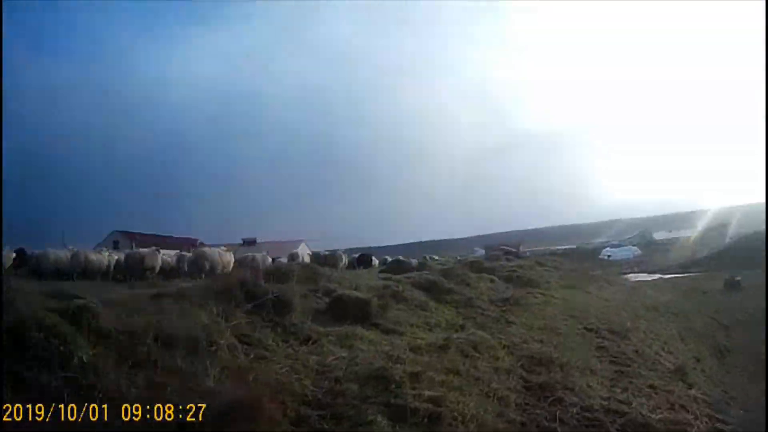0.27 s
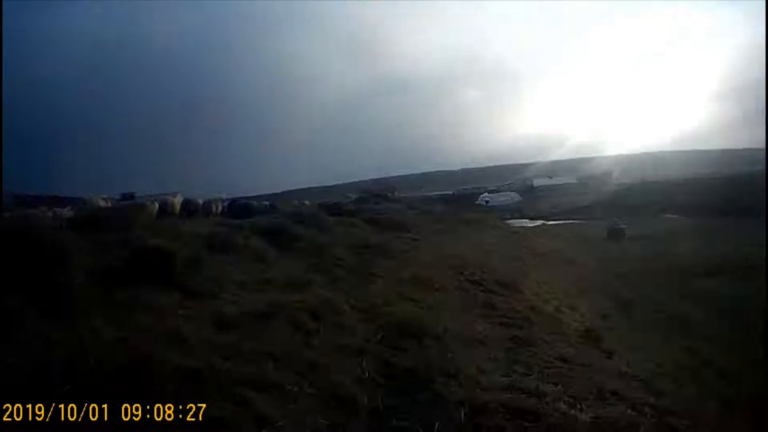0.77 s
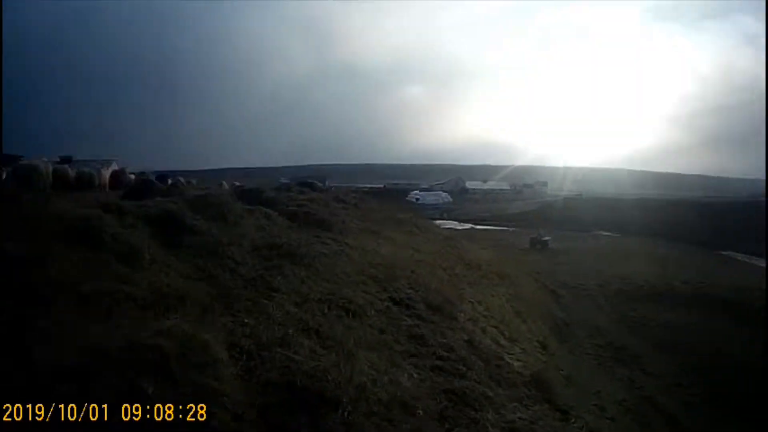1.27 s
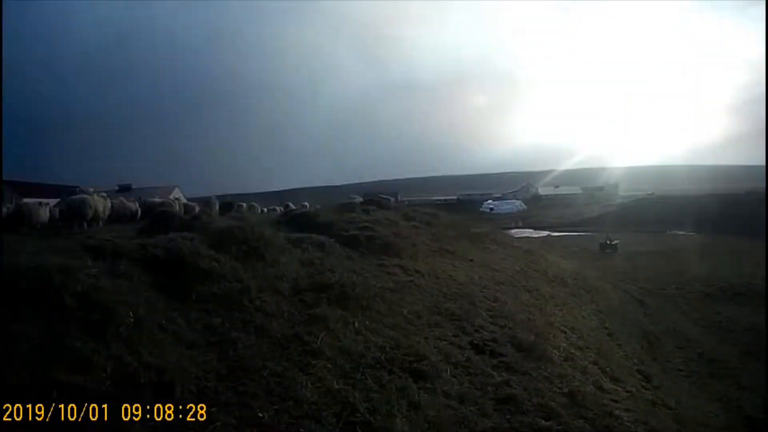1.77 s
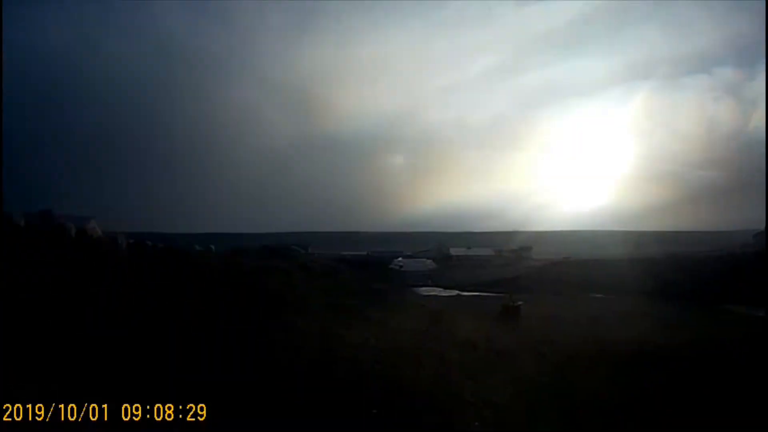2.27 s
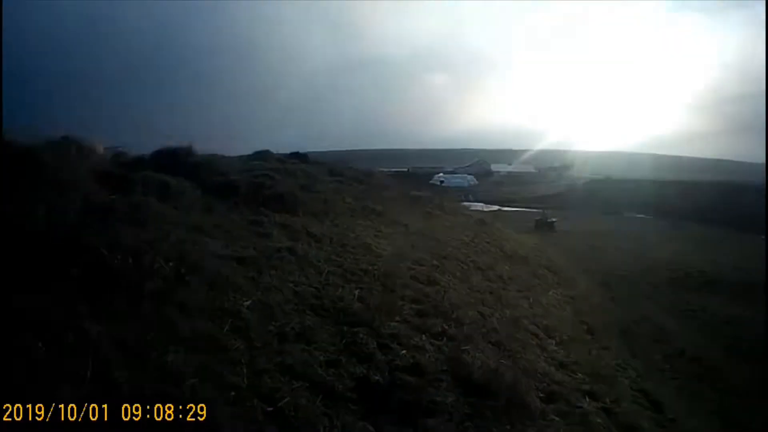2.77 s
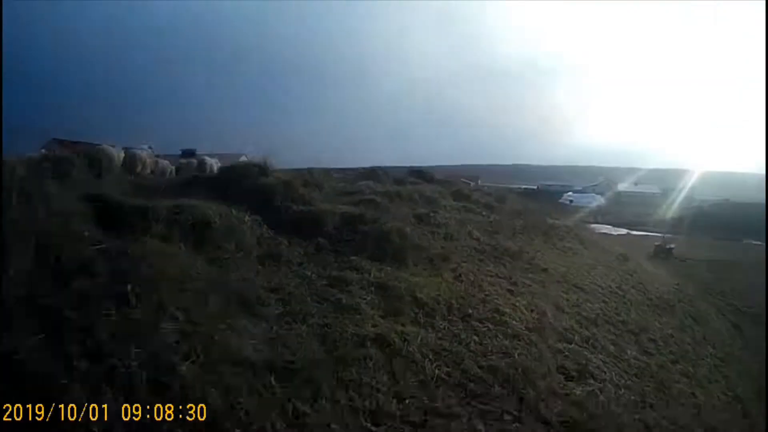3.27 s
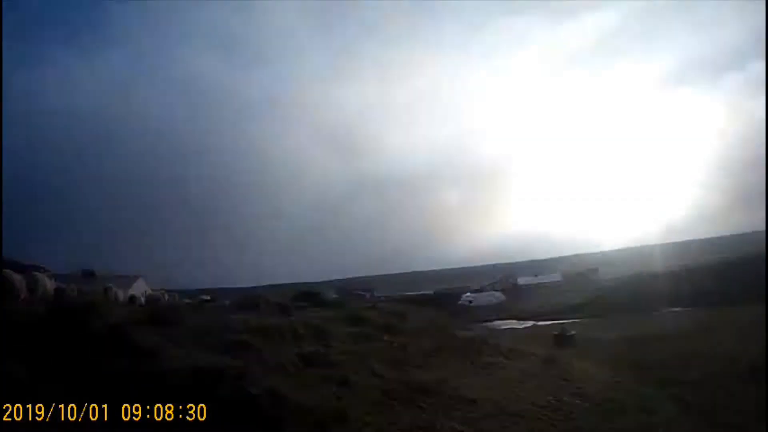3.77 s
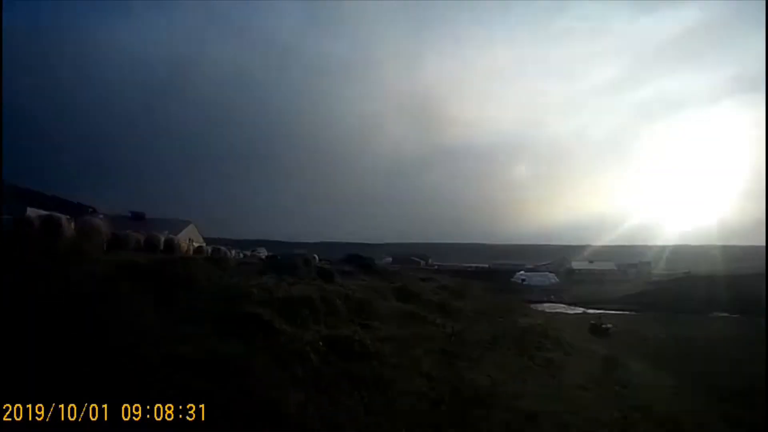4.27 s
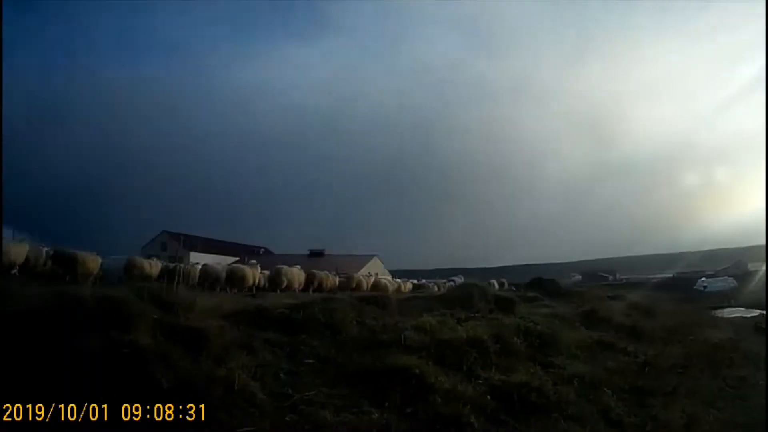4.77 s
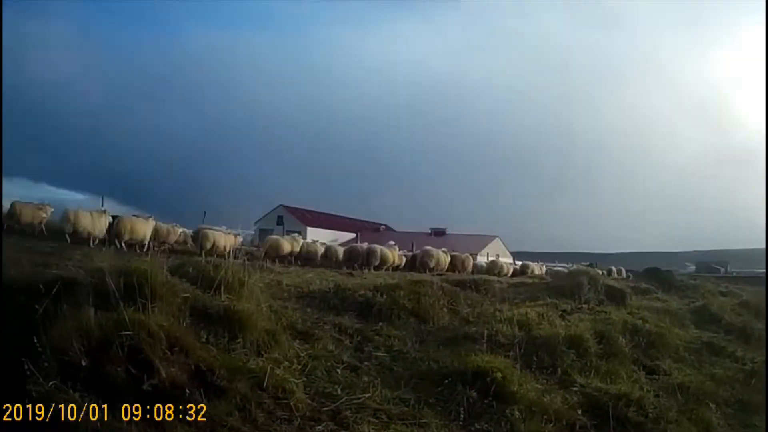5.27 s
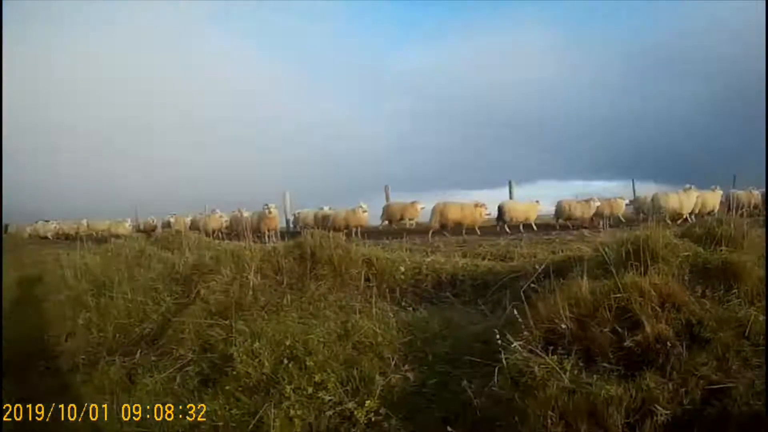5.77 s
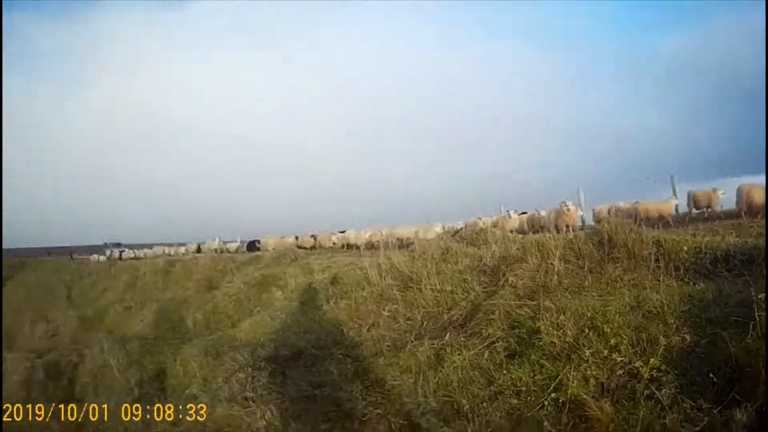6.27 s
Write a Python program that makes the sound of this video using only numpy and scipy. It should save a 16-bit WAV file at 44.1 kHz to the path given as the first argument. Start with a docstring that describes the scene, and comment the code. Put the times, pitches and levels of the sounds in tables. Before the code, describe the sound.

Someone strides through coarse grass, rustling and crunching, the strapped-on microphone bumping and rumbling until the walker stops and only faint wind and hiss remain.

```python
"""0-5 s: a walker strides through rough grass on open ground, a small cased microphone strapped on.
Brushes and crunches are noise grains coloured by the case; shakes ring the mount; noise buffets the port.
Stalks snap (noise bursts), jolts swing the pressure and ring, tall blades swish (bright grains).
5 s to the end: the walker slows to a stop and turns; events thin out, the mount trembles faintly.
Throughout: far wind (shaped noise) and faint white hiss."""
import sys
import numpy as np
from scipy import signal
from scipy.fft import rfft, irfft, next_fast_len
from scipy.io import wavfile
from scipy.ndimage import uniform_filter1d

SR = 44100
rng = np.random.default_rng(int(sys.argv[2]) if len(sys.argv) > 2 else 0)


def int16_out(signal):
    """Quantize to a 16-bit WAV file."""
    q = np.round(np.clip(np.atleast_2d(signal).T, -1, 1) * 32767)
    wavfile.write(sys.argv[1], SR, q.astype(np.int16))


N = 287796

# far wind spectrum: f/Hz, level/dB
FAR_WIND_COLOUR = [(18, -35), (30, 4), (71, -25.5), (197, -7.5), (647, -18.5), (1150, -24), (2770, -40),
                   (4000, -39.5), (5200, -44), (8800, -120)]
FAR_WIND_DB = -55.5
# boot or leg brushing blades: full at t/s, rise over 20 dB/s, hold/s, fall over 20 dB/s, level/dB,
# then against level: 2 kHz register/dB, treble/dB, low-mid/dB
BRUSHES = [(0.04, 0.083, 0.02, 0.046, -39, -4.0, -9, -0.5),
           (0.142, 0.042, 0.057, 0.052, -38, -6, -10.5, -7),
           (0.236, 0.012, 0.088, 0.014, -46.5, -4, -12.5, -2.5),
           (0.384, 0.057, 0.032, 0.058, -36.5, -7, -11.5, -4),
           (0.496, 0.052, 0.099, 0.029, -39.5, -8.5, -9, -7.5),
           (0.665, 0.011, 0.028, 0.025, -50, -12, -9.0, -4.5),
           (0.745, 0.012, 0.068, 0.018, -43, -11, -6, -2.5), (0.779, 0.019, 0.008, 0.12, -33, -2.5, -9, -3),
           (0.934, 0.094, 0.022, 0.052, -37.5, -7, -11.5, -11),
           (1.033, 0.091, 0.018, 0.016, -50.5, -7.5, -16, -5),
           (1.165, 0.13, 0.004, 0.055, -36, -8, -11, -3.5),
           (1.257, 0.044, 0.16, 0.098, -46.0, -7, -10, -2.5),
           (1.488, 0.12, 0.007, 0.014, -46, -10, -13, -5), (1.571, 0.033, 0.019, 0.032, -36, -3, -9, 1.5),
           (1.645, 0.092, 0.036, 0.045, -40.5, -2, -12, -3.5),
           (1.726, 0.037, 0.084, 0.17, -37.0, -6.0, -12.5, -6),
           (1.957, 0.0082, 0.004, 0.054, -42.5, 4.5, -9, 5),
           (1.997, 0.034, 0.037, 0.028, -30, -6.5, -12, -2.5),
           (2.153, 0.12, 0.071, 0.058, -32.0, -5, -6, -2.5),
           (2.436, 0.037, 0.0096, 0.031, -22.5, -7.5, -12, -5.5),
           (2.486, 0.024, 0.004, 0.069, -38.5, -0.5, -15.5, -8),
           (2.64, 0.14, 0.025, 0.046, -31.5, -4, -9.5, -4.5),
           (2.732, 0.043, 0.019, 0.071, -32, -6.0, -12.5, -1),
           (2.919, 0.37, 0.041, 0.11, -37, -4.5, -8, -4.5), (3.033, 0.032, 0.019, 0.012, -42, -11, -11, -6),
           (3.138, 0.016, 0.0043, 0.027, -19, -5.5, -17, -5),
           (3.177, 0.222, 0.065, 0.019, -41.5, -4, -10, 0.0),
           (3.288, 0.079, 0.056, 0.045, -28.5, -5, -13, -9.5),
           (3.516, 0.072, 0.006, 0.048, -37, -3, -12, -0.5),
           (3.622, 0.15, 0.098, 0.016, -45, -9, -9.5, -5.5), (3.766, 0.013, 0.06, 0.056, -53, -12, -12, -2),
           (3.887, 0.038, 0.023, 0.014, -38, -10, -7.0, 0),
           (3.946, 0.036, 0.009, 0.095, -39.0, -4.0, -10, -0.5),
           (4.048, 0.042, 0.18, 0.018, -44.5, -2.5, -11.0, -3.5),
           (4.284, 0.049, 0.039, 0.081, -34, -10, -12.0, -5.5),
           (4.422, 0.11, 0.052, 0.047, -38.5, -11, -9.0, -5.5),
           (4.633, 0.54, 0.052, 0.14, -49.5, -19, -16, -0.5),
           (4.691, 0.037, 0.004, 0.077, -40.5, -4.5, -8.5, -6.5),
           (4.908, 0.14, 0.005, 0.11, -45.0, -0.5, -11.5, -3.5),
           (5.163, 0.012, 0.049, 0.037, -58.5, -4, -10.5, 5.5),
           (6.229, 0.32, 0.004, 0.057, -59.5, -0.5, -6.5, -0.5),
           (6.308, 0.066, 0.004, 0.069, -52, -3, -7, -5), (6.362, 0.012, 0.1, 0.049, -57.5, 1, -7.5, -6)]
# cloth rustle between brushes: t/s, level/dB
CLOTH = [(0, -58), (4.6, -57.5), (5.2, -65), (6.53, -73)]
# cloth colour against its level: 2 kHz register/dB, treble/dB, low-mid/dB
CLOTH_COLOUR_DB = (-3.5, -10.5, -4.5)
# foot landing or pulling out: t/s, level/dB, low-mid against it/dB, treble against it/dB
CRUNCHES = [(0.1451, -35, -17, -21), (0.387, -30.5, 3, -23), (0.4738, -42, -9, -10), (0.7447, -37, 1, -8),
            (1.558, -34.5, -6, 0), (1.5815, -25, 7.5, -24), (1.9574, -39, -7, -14), (2.004, -27, 8, -19),
            (2.197, -26.5, 0, -4.5), (2.4049, -35, -14, -14), (2.4384, -19, -6, -21),
            (2.4917, -33, -19, -28), (3.14, -10.5, -3, -30), (3.287, -18, -14, -19),
            (3.4975, -28.5, -15, -11), (3.7688, -48, -10, -20), (3.885, -29.5, 8.5, -10),
            (4.2682, -39, -5.5, -17), (4.292, -35.5, 13, -23), (4.6942, -29, -20, -24)]
CRUNCH_RISE_S, CRUNCH_T60_S = 0.0018, 0.055
CRUNCH_UPPER_DB = -13.5  # 2 kHz register against level
# colour of the case: f/Hz, level/dB
CASE_COLOUR = [(240, -2), (400, -13.5), (639, -9.5), (757, -10), (897, -25), (1230, 4.5), (1470, -11),
               (1990, -2.5), (2480, -24), (3520, -19.5), (4230, -23.5), (5280, -46.5), (6010, -35.5),
               (6850, -50), (9000, -53.5), (11700, -82), (19800, -120)]
# swells of the mount's ringing: tugs up to 5.2 s, after that only chance swells of its faint trembling;
# full at t/s, rise over 20 dB/s, hold/s, fall over 20 dB/s, level/dB,
# then against level: upper modes/dB, lowest mode/dB
MOUNT_SWELLS = [(0.041, 0.17, 0.034, 0.021, -27, -11.5, -17),
                (0.156, 0.082, 0.053, 0.048, -35.5, -6.0, -12),
                (0.316, 0.023, 0.0056, 0.022, -35, -14, -9.5), (0.381, 0.062, 0.056, 0.06, -32, -8, -10),
                (0.529, 0.073, 0.0056, 0.13, -30.5, -8.5, -6), (0.653, 0.017, 0.009, 0.056, -35.5, -14, -2),
                (0.754, 0.037, 0.017, 0.014, -29.5, -4, -0.5), (0.792, 0.056, 0.075, 0.058, -30, -7, -4),
                (0.931, 0.16, 0.025, 0.097, -40, 1.5, -8), (1.11, 0.024, 0.12, 0.018, -33.5, -6.5, -2.5),
                (1.287, 0.047, 0.018, 0.41, -38, -5.5, -1.5), (1.585, 0.12, 0.004, 0.24, -29.5, -4.5, -0.5),
                (1.698, 0.015, 0.006, 0.035, -26.5, -11, -10.0), (1.761, 0.021, 0.004, 0.04, -35.5, 1, -2),
                (1.971, 0.022, 0.014, 0.025, -26, -3, -10.5),
                (2.012, 0.019, 0.005, 0.13, -20.5, -10.5, -15.5),
                (2.152, 0.044, 0.016, 0.024, -21.5, -5, -16), (2.214, 0.02, 0.01, 0.16, -33.0, -2, 0),
                (2.436, 0.026, 0.0034, 0.053, -13.5, -6, -18), (2.474, 0.13, 0.005, 0.093, -23.5, -6.5, -9),
                (2.684, 0.38, 0.09, 0.051, -32, 0, -3.5), (2.799, 0.053, 0.0053, 0.03, -22.5, -12.0, -9),
                (2.878, 0.044, 0.007, 0.067, -25.5, -7.5, -15.5),
                (2.958, 0.077, 0.019, 0.016, -31.0, -9, -14), (3.126, 0.055, 0.036, 0.058, -20, -10.5, 2),
                (3.273, 0.23, 0.06, 0.064, -32, -3.5, -10.0), (3.499, 0.065, 0.033, 0.017, -32, 1.0, -16),
                (3.561, 0.014, 0.004, 0.082, -23.5, -14, -15), (3.68, 0.22, 0.033, 0.017, -34.5, -10, -8),
                (3.87, 0.039, 0.012, 0.096, -30.5, -3.5, -1), (3.943, 0.024, 0.012, 0.11, -28.5, -6, -5),
                (4.151, 0.012, 0.014, 0.36, -43.5, -11, -4), (4.324, 0.092, 0.0056, 0.022, -22, -6, -13),
                (4.366, 0.089, 0.085, 0.094, -39, -9, 4.5), (4.781, 0.014, 0.0072, 0.0098, -23, -20, -7),
                (4.917, 0.103, 0.004, 0.077, -40.5, -10, -4), (5.161, 0.015, 0.043, 0.054, -35.5, -25, -19),
                (5.886, 0.035, 0.01, 0.32, -55.5, -6.5, 3.5), (6.372, 0.24, 0.005, 0.12, -45, 0, -1),
                (6.441, 0.024, 0.057, 0.114, -47.5, -1, -7)]
# steady trembling of the mount under the swells: t/s, level/dB
TREMBLE = [(0, -45), (3.6, -51), (4.8, -36), (5.3, -56.5), (5.9, -58.5), (6.53, -62)]
# tremble colour against its level: upper modes/dB, lowest mode/dB
TREMBLE_COLOUR_DB = (-5, -4)
# main mount mode: f/Hz, width/Hz, level/dB
MOUNT_MAIN = [(129.3, 26.6, 1.5)]
# lowest mount mode: f/Hz, width/Hz, level/dB
MOUNT_LOWEST = [(86.4, 43, 0)]
# upper mount modes: f/Hz, width/Hz, level/dB
MOUNT_UPPER = [(271.3, 24, 5), (375.3, 18, -3), (226, 98, 0.5)]
# port pressure from sway and gusts: full at t/s, rise over 20 dB/s, hold/s, fall over 20 dB/s, level/dB
SWINGS = [(0.0, 0.021, 0.041, 0.14, -25), (0.229, 0.037, 0.014, 0.017, -29.5),
          (0.387, 0.075, 0.062, 0.106, -21.5), (0.592, 0.049, 0.014, 0.017, -31),
          (0.685, 0.052, 0.047, 0.023, -33), (0.774, 0.022, 0.013, 0.048, -13),
          (0.866, 0.024, 0.0086, 0.036, -33), (0.958, 0.029, 0.013, 0.015, -26),
          (1.206, 0.22, 0.009, 0.13, -21.5), (1.401, 0.022, 0.025, 0.014, -33),
          (1.582, 0.11, 0.005, 0.059, -17), (1.637, 0.079, 0.11, 0.19, -31),
          (2.017, 0.109, 0.013, 0.17, -23), (2.123, 0.052, 0.004, 0.2, -21.5),
          (2.419, 0.052, 0.022, 0.039, -12), (2.468, 0.033, 0.027, 0.16, -11.0),
          (2.737, 0.027, 0.0096, 0.032, -8.5), (2.781, 0.021, 0.0067, 0.11, -15),
          (3.115, 0.049, 0.031, 0.012, -20), (3.178, 0.025, 0.025, 0.077, -18),
          (3.358, 0.053, 0.03, 0.016, -31.5), (3.508, 0.045, 0.079, 0.03, -19.5),
          (3.92, 0.18, 0.075, 0.098, -23), (4.287, 0.099, 0.0066, 0.028, -17.5),
          (4.359, 0.025, 0.007, 0.08, -16.5), (4.558, 0.014, 0.14, 0.016, -36.5),
          (4.723, 0.015, 0.031, 0.02, -27.5), (4.932, 0.089, 0.008, 0.044, -34),
          (5.187, 0.042, 0.004, 0.11, -26.5), (5.471, 0.18, 0.004, 0.17, -39),
          (5.712, 0.098, 0.004, 0.033, -37.5), (6.017, 0.19, 0.005, 0.053, -33),
          (6.32, 0.015, 0.005, 0.106, -35)]
# low wind at the port under the swings: t/s, level/dB
PORT_WIND = [(0, -40), (2.2, -39), (2.9, -34), (3.6, -42), (5.1, -46), (5.8, -52), (6.53, -45)]
# dry stalks snapping: t/s, level/dB
SNAPS = [(0.334, -46.5), (2.178, -41), (2.2179, -50), (2.289, -45), (2.2954, -49), (2.6459, -51),
         (2.9667, -49), (3.577, -50)]
# jolts through the body: t/s, level/dB, half swing/s, ring against swing/dB
JOLTS = [(0.385, -16, 0.025, -6), (0.741, -22, 0.021, -4.5), (1.12, -32, 0.01, -7),
         (1.558, -12, 0.011, -10), (2.009, -16, 0.02, 2), (2.155, -24, 0.01, -4), (2.41, -8.5, 0.013, -8.5),
         (2.481, -11.5, 0.017, 0), (2.739, -23, 0.017, 3), (2.789, -17, 0.015, 4), (3.12, -3.5, 0.007, -7),
         (3.194, -13, 0.015, -3.5), (3.509, -15.5, 0.03, -13), (3.556, -18, 0.04, -5),
         (3.861, -18, 0.013, -1), (4.772, -25, 0.013, 0), (4.906, -31, 0.015, 8.5), (5.164, -40, 0.02, -5),
         (5.455, -27, 0.014, -14), (5.985, -27, 0.016, -19)]
SWING_DECAY = 1.6  # half swings to fall to 37%
RING_HZ, RING_RISE_S, RING_T60_S = 131.2, 0.008, 0.1
# leg swishing through tall blades: middle t/s, half length/s, level/dB
SWISHES = [(.55, .06, -77), (2.02, .03, -77), (2.163, 0.15, -66), (2.43, 0.012, -64), (2.627, 0.045, -82),
           (2.886, 0.057, -61.5), (3.153, 0.025, -65), (3.895, 0.021, -69), (4.333, 0.095, -67),
           (4.436, 0.033, -72)]
HISS_DB, CUTOFF_HZ = -65, 15750


def amp(db):
    """Gain of a level in dB."""
    return 10 ** (np.asarray(db) / 20)


def rms_one(x):
    """Scale to rms 1."""
    return x / np.sqrt(np.mean(x ** 2) + 1e-20)


def drift(rate_hz):
    """Slow random wander: noise through two equal poles at rate_hz; rms 1."""
    r = np.exp(-2 * np.pi * rate_hz / SR)
    noise = rng.standard_normal(N + SR)
    return rms_one(signal.lfilter([1], [1, -2 * r, r * r], noise)[SR:])  # settled part


def coloured(x, points):
    """Filter by a spectrum of (f/Hz, level/dB) points, interpolated over log frequency."""
    size = next_fast_len(N)
    hz, db = np.transpose(points)
    log_hz = np.log(np.arange(size // 2 + 1) * SR / size + 1)  # +1 Hz keeps DC finite
    gain = amp(np.interp(log_hz, np.log(hz), db))
    return irfft(rfft(x, size) * gain, size)[:N]


def band(x, low_hz, high_hz, order=2):
    """Butterworth band-pass."""
    sos = signal.butter(order, [low_hz, high_hz], "band", fs=SR, output="sos")
    return signal.sosfilt(sos, x)


def modes(x, table):
    """Two-pole resonances in parallel, signs alternating."""
    out = 0
    for k, (hz, width_hz, db) in enumerate(table):
        r = np.exp(-np.pi * width_hz / SR)
        b = (1 - r * r) / 2 * np.array([1, 0, -1])
        a = [1, -2 * r * np.cos(2 * np.pi * hz / SR), r * r]
        out = out + (-1) ** k * amp(db) * signal.lfilter(b, a, x)
    return out


def grains(per_s, spread_db):
    """Random tiny contacts of uneven size and either sign; rms 1."""
    sizes = amp(spread_db * np.minimum(rng.exponential(1, N), 4))
    signs = rng.choice([-1, 1], N)
    struck = rng.random(N) < per_s / SR
    return rms_one(sizes * signs * struck)


def evened(x, window_s, share):
    """Press flat a share of the chance swelling of a narrow noise; rms 1."""
    power = uniform_filter1d(rms_one(x) ** 2, round(window_s * SR))
    return rms_one(x / (power + 0.05) ** (share / 2))


def patchy(x, low_hz, high_hz, patchy_db, count=3):
    """Cut a register into slices that swell and fade independently; rms 1."""
    edges_hz = np.geomspace(low_hz, high_hz, count + 1)
    slices = [band(x, a, b) * amp(patchy_db * drift(16.5)) for a, b in zip(edges_hz, edges_hz[1:])]
    return rms_one(sum(slices))


def strokes(events, between, between_db=()):
    """Level/dB of events that rise, hold and fall over a quieter bed; then each colour against it/dB."""
    t = np.arange(0, N / SR + 0.002, 0.001)
    full, rise, hold, fall, level_db, *colours_db = np.transpose(events)[:, :, None]
    rise_db = -20 * np.maximum(full - t, 0) / rise
    fall_db = -20 * np.maximum(t - full - hold, 0) / fall
    power = amp(2 * (level_db + rise_db + fall_db))
    bed = amp(2 * np.interp(t, *np.transpose(between)))
    total = power.sum(axis=0) + bed
    curves = [total]
    for event_db, bed_db in zip(colours_db, between_db):
        colour_power = (power * amp(2 * event_db)).sum(axis=0) + bed * amp(2 * bed_db)
        curves.append(colour_power / total)
    t_out = np.arange(N) / SR
    return [np.interp(t_out, t, 10 * np.log10(p)) for p in curves]


def far_wind():
    """Distant wind: shaped noise of wandering level."""
    level_db = FAR_WIND_DB + 2.5 * drift(7.6)
    return amp(level_db) * rms_one(coloured(rng.standard_normal(N), FAR_WIND_COLOUR))


def crunch_swell(extra_db):
    """Extra grain strength after each crunch: quick rise, exponential decay."""
    t = np.arange(SR // 4) / SR
    t_s, level_db = np.transpose(CRUNCHES)[:2]
    clicks = np.zeros(N)
    clicks[(t_s * SR).astype(int)] = amp(level_db + extra_db)
    envelope = amp(-60 * t / CRUNCH_T60_S) * (1 - np.exp(-t / CRUNCH_RISE_S))
    return np.abs(signal.fftconvolve(clicks, envelope)[:N])


def rustle():
    """Blades and cloth brush in dense grains with coarser crackle on top; the case colours them."""
    level_db, upper_db, treble_db, low_db = strokes(BRUSHES, CLOTH, CLOTH_COLOUR_DB)
    crunch_low_db, crunch_treble_db = np.transpose(CRUNCHES)[2:]
    level_db = level_db + 0.68 * drift(30)
    crackle = grains(200, 2.8)  # single blades breaking sound in all registers at once

    def register(low_hz, high_hz, crackle_share, stroke_db, crunch_db):
        """One band of contacts, driven by brushes and crunches."""
        contacts = grains(7000, 1.8) + crackle_share * crackle
        strength = np.hypot(amp(level_db + stroke_db), crunch_swell(crunch_db))
        return strength * patchy(coloured(contacts, CASE_COLOUR), low_hz, high_hz, patchy_db=2.0)

    main = register(864, 1510, 0.57, 0, 0)
    upper = register(1580, 2544, 1.0, upper_db, CRUNCH_UPPER_DB)
    treble = register(2703, 10700, 0.36, treble_db + 2.1 * drift(35), crunch_treble_db)
    low = register(344, 865, 0.66, low_db + 1.1 * drift(40), crunch_low_db)
    return main + upper + treble + low


def shake():
    """Uneven pushes keep the mount's modes ringing."""
    level_db, upper_db, lowest_db = strokes(MOUNT_SWELLS, TREMBLE, TREMBLE_COLOUR_DB)

    def ringing(pushes, mount, broad_hz, broad_width_hz, window_s, share):
        """Mount modes, then one broad resonance, partly evened."""
        rung = modes(modes(pushes, mount), [(broad_hz, broad_width_hz, 0)])
        return evened(rung, window_s, share)

    main = ringing(grains(250, 3.6), MOUNT_MAIN, 129, 115, 0.0424, 0.36)
    lowest = ringing(grains(150, 2.1), MOUNT_LOWEST, 79.6, 49, 0.065, 0.99)
    upper = ringing(grains(700, 3.4), MOUNT_UPPER, 284, 505, 0.059, 0.15)
    mix = main + amp(upper_db) * upper + amp(lowest_db) * lowest
    return amp(level_db + 1.2 * drift(26)) * mix


def buffet():
    """Lumpy low-frequency pressure at the port from sway, gusts and low wind."""
    level_db, = strokes(SWINGS, PORT_WIND)
    lumps = band(rng.standard_normal(N + SR), 8.6, 17.7, order=1)[SR:]
    lumps = signal.sosfilt(signal.butter(2, 52.0, fs=SR, output="sos"), lumps)
    return amp(level_db) * evened(lumps, 0.16, 0.44)


def snaps(t60_s):
    """Stalks snap: bright noise bursts, decaying within milliseconds."""
    t = np.arange(SR // 100) / SR
    out = np.zeros(N + len(t))
    for t_s, level_db in SNAPS:
        i = round(t_s * SR)
        burst = rng.standard_normal(len(t)) * amp(-60 * t / t60_s)
        out[i:i + len(t)] += amp(level_db) * burst
    return band(out[:N], 2800, 14000)


def jolts():
    """Each jolt is a dying pressure swing, suction first, and a short ring of the mount."""
    out = np.zeros(N)
    for t_s, level_db, half_s, ring_db in JOLTS:
        i = round(t_s * SR)
        t = np.arange(min(SR // 4, N - i)) / SR
        swing = -np.sin(np.pi * t / half_s) * np.exp(-t / (SWING_DECAY * half_s))
        ring_envelope = amp(ring_db - 60 * t / RING_T60_S) * (1 - np.exp(-t / RING_RISE_S))
        ring = ring_envelope * np.sin(2 * np.pi * RING_HZ * t)
        out[i:i + len(t)] += amp(level_db) * (swing + ring)
    return out


def swishes():
    """Bright, fine-grained hiss that swells and fades, reaching the port through the air."""
    t = np.arange(N) / SR
    swell = sum(amp(db) * np.exp(-((t - mid_s) / half_s) ** 2) for mid_s, half_s, db in SWISHES)
    flicker = amp(2 * drift(40))
    return swell * flicker * rms_one(band(grains(9000, 2.5), 4100, 13000, order=1))


def scene():
    """Sum of far wind and the near sounds, one channel."""
    far = far_wind()
    near = rustle() + swishes() + shake() + buffet() + jolts() + snaps(t60_s=0.012)
    return (near + far)[None]


def record(dry):
    """The preamplifier adds white hiss; the top end droops and is then cut."""
    hiss = amp(HISS_DB) * rng.standard_normal(dry.shape)
    droop = signal.cheby2(6, 30, 16250, fs=SR, output="sos")
    cut = signal.ellip(12, 0.5, 70, CUTOFF_HZ, fs=SR, output="sos")
    return signal.sosfilt(cut, signal.sosfilt(droop, dry + hiss))


dry = scene()
out = record(dry)
int16_out(out)
```